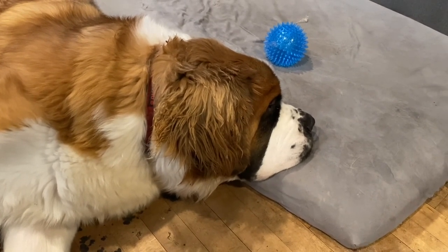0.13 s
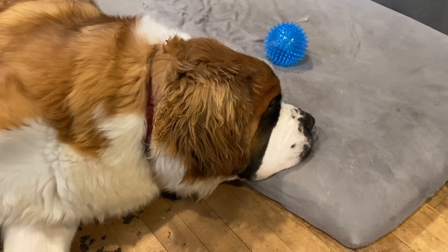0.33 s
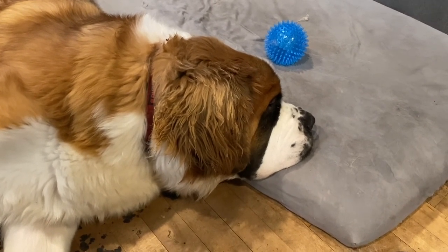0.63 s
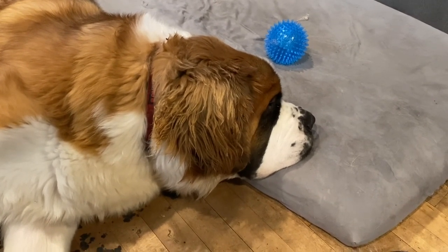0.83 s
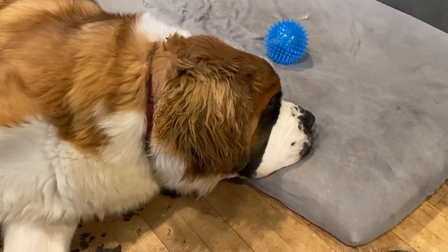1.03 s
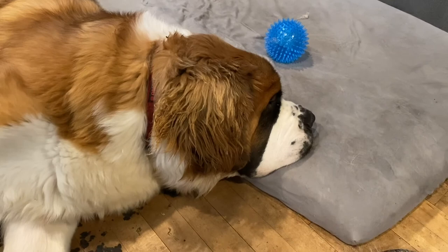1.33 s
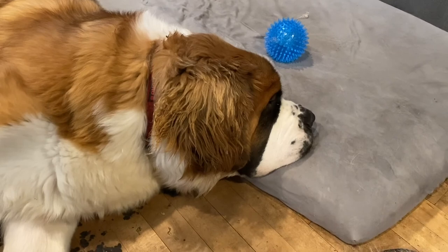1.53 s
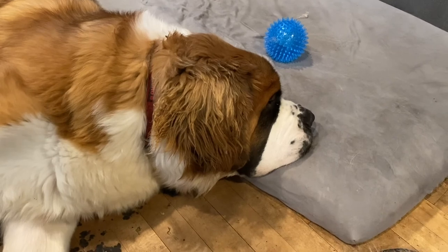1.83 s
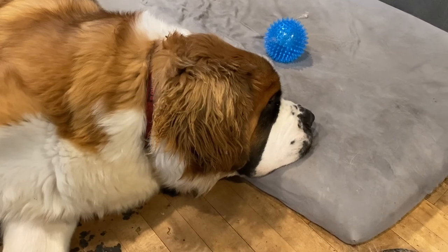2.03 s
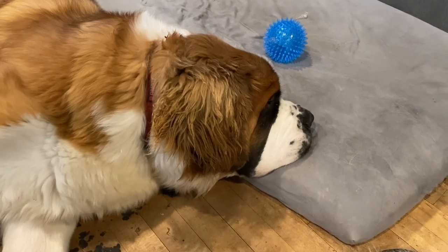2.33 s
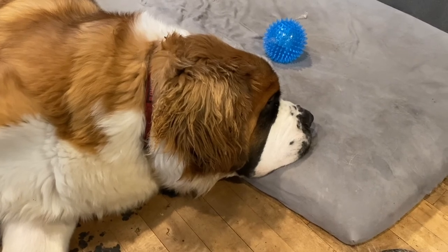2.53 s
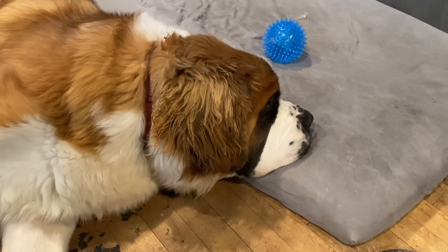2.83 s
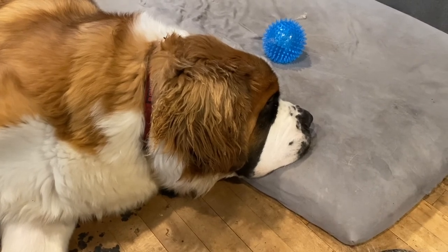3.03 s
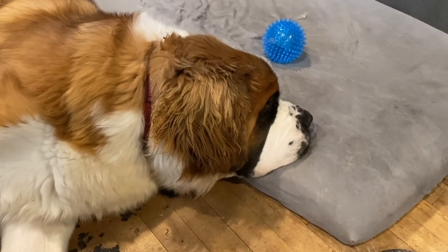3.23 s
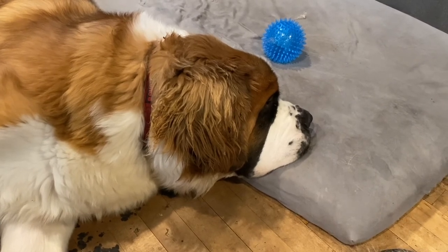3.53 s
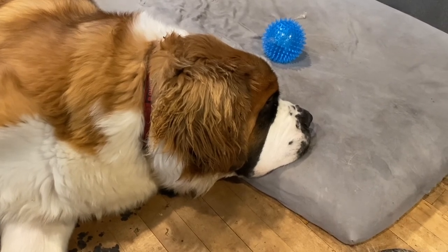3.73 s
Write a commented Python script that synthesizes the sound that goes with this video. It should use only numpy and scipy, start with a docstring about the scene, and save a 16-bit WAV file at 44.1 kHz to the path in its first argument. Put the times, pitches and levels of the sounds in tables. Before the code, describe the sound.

Single quiet dog snore, hissy and fluttering, swelling and ending in a soft click, followed by a brief airy tail and tiny breaths, over steady low indoor rumble, faint machine hum and thin hiss, in stereo.

```python
"""A quiet room, where a large dog sleeps on a cushion and gives one faint snore. Turbulent air hisses through the
resonances of its nose while the soft palate flaps some 20 times a second, each flap a decaying puff of noise;
once the palate pops and rings the mouth cavity. Soft broad puffs of breath, shaped noise, come before and after.
The room rumbles in its low modes, as noise and one wavering sine, with faint machine tones under a thin hiss."""
import sys
import numpy as np
from scipy import signal
from scipy.fft import rfft, irfft, next_fast_len
from scipy.io import wavfile
from scipy.ndimage import uniform_filter1d, map_coordinates

SR = 44100
rng = np.random.default_rng(int(sys.argv[2]) if len(sys.argv) > 2 else 0)


def int16_out(signal):
    """Quantize to a 16-bit WAV file."""
    q = np.round(np.clip(np.atleast_2d(signal).T, -1, 1) * 32767)
    wavfile.write(sys.argv[1], SR, q.astype(np.int16))


def magnitude_from_level(level_db):
    """Linear magnitude for a level in decibels (20 dB per decade)."""
    exponent = np.asarray(level_db, float) / 20
    return 10 ** exponent


N = 171990  # length in samples

# Stereo likeness of the dog's noises. Each row: frequency in Hz, left-right correlation.
DOG_CORRELATION = [(400, 0.58), (1000, 0.12), (2000, 0.75), (3000, .5), (5000, 0.21), (10000, 0.25)]


def unit(x):
    """Normalisation: scale to rms 1."""
    return x / np.sqrt(np.mean(x ** 2) + 1e-20)


def along(points, hz):
    """Interpolation of (Hz, value) points on a logarithmic frequency axis."""
    f, v = np.transpose(points)
    return np.interp(np.log(hz + 1), np.log(f + 1), v)


def level(rows):
    """Envelope: gain per sample, linear in dB between (s, dB) rows."""
    s, db = np.transpose(rows)
    return magnitude_from_level(np.interp(np.arange(N) / SR, s, db))


def wobble(rate):
    """Slow random fluctuation: a smooth curve through normal draws, rate knots a second."""
    knots = rng.standard_normal(int(N * rate / SR) + 4)
    return map_coordinates(knots, [np.arange(N) * rate / SR])


def wavering_tone(hz):
    """Frequency modulation: phase is the running sum of a frequency that drifts by about 1.2 Hz."""
    return np.sin(2 * np.pi * np.cumsum(hz + 1.2 * wobble(8)) / SR)


def filtered(x, response):
    """Linear filtering: multiply the spectrum by a complex response of frequency."""
    m = next_fast_len(N + SR // 2)
    return irfft(rfft(x, m) * response(np.fft.rfftfreq(m, 1 / SR)), m)[..., :N]


def resonances(rows):
    """Superposed damped resonators of alternating sign, from (Hz, width in Hz, dB) rows."""
    def response(f):
        total = 0
        for k, (centre, width, db) in enumerate(rows):
            damping = 1j * f * width
            total = total + (-1) ** k * magnitude_from_level(db) * damping / (centre * centre - f * f + damping + 1e-9)
        return total
    return response


def colour(points):
    """Spectral envelope: zero-phase response through (Hz, dB) points."""
    return lambda hz: magnitude_from_level(along(points, hz))


def rush(response, correlation, patchy_db):
    """Turbulence noise in stereo: mid at rms 1, side set by the correlation, streaks of random gain."""
    z = signal.stft(rng.standard_normal((2, N)), nperseg=1024)[2]
    field = uniform_filter1d(rng.standard_normal(z.shape[1:]), size=2, axis=0)
    field = uniform_filter1d(field, size=6, axis=1)  # longer in time than in frequency
    pair = signal.istft(z * magnitude_from_level(patchy_db * unit(field)), nperseg=1024)[1][:, :N]

    def mid_side(hz):
        angle = np.arccos(np.clip(along(correlation, hz), -1, 1)) / 2
        return response(hz) * [np.cos(angle), np.sin(angle)]

    mid, side = filtered(pair, mid_side)
    return np.array([mid + side, mid - side]) / np.sqrt(np.mean(mid ** 2))


def palate_flaps():
    """Pulsed airflow: each flap releases a quick-rising, exponentially dying puff; nose, throat, bright gains."""
    # Flaps of the soft palate. Each row: time in seconds (the puff starts one rise time before),
    # level in dB before a 6 dB lift, throat part and bright part in dB relative to the nose part.
    flaps = [(0.724, -70.5, 14, -4), (0.82, -69, 10, -3), (0.904, -69, 20, -1), (0.952, -65, 18.5, 0.5),
             (0.998, -55.5, 8, -5), (1.048, -54, 7.5, -9), (1.103, -58.5, 12.5, -21), (1.138, -63, -1, -19),
             (1.2, -61, -6, -18), (1.245, -56, 2, -18), (1.277, -53.5, 0.5, -18), (1.314, -53.5, 6.5, -16),
             (1.356, -48, -17, -12), (1.405, -60, -4, -28)]
    rise_s, t60_s = 0.0053, 0.087
    t = np.arange(N) / SR
    nose, throat, bright = np.zeros((3, N))
    for s, db, throat_db, bright_db in flaps:
        u = np.maximum(t - s + rise_s, 0)
        puff = magnitude_from_level(db + 6 - 60 * u / t60_s) * (1 - np.exp(-u / rise_s)) ** 2
        nose += puff
        throat += magnitude_from_level(throat_db) * puff
        bright += magnitude_from_level(bright_db) * puff
    return nose, throat, bright


def nose_hiss():
    """Resonance of the nasal passages: turbulence noise rings in upper and lower formants."""
    # Upper nose resonances. Each row: frequency in Hz, width in Hz, level in dB.
    upper = [(2680, 240, -2), (2970, 136, 1), (3164, 145, -2.5)]
    # Lower nose resonances. Each row: frequency in Hz, width in Hz, level in dB.
    lower = [(1975, 270, 1.5), (2415, 190, -1.5)]
    # Share of the lower resonances against the upper. Each row: time in seconds, level in dB.
    lower_share = [(0.65, 17), (0.75, 0), (0.9, -5.5), (1.1, -7.5), (1.2, -7.5), (1.33, -11.5), (1.4, -4.5),
                   (1.55, -4.5), (1.65, -3), (1.9, -0.5), (2.2, -4), (2.45, 8)]

    def steep(rows):
        """Band limits: resonances confined between 1700 and 3600 Hz."""
        peaks = resonances(rows)
        return lambda hz: peaks(hz) / (1 + (1700 / (hz + 1)) ** 8) / (1 + (hz / 3600) ** 12)

    upper_hiss = rush(steep(upper), DOG_CORRELATION, patchy_db=2)
    return upper_hiss + level(lower_share) * rush(steep(lower), DOG_CORRELATION, patchy_db=2)


def snore():
    """Modulated turbulence: steady flow and palate puffs drive noise in nose, throat and treble."""
    # Air drawn through the nose. Each row: time in seconds, level in dB.
    flow_rows = [(0.62, -104), (0.68, -89), (0.73, -73.5), (0.79, -79), (0.86, -71), (0.95, -66),
                 (1.15, -66.5), (1.33, -65.5), (1.43, -70), (1.495, -81), (1.53, -73), (1.62, -67),
                 (1.67, -73), (1.71, -86.5), (1.82, -96), (1.9, -73.5), (1.99, -86), (2.14, -82),
                 (2.25, -78.5), (2.32, -83.5), (2.42, -81), (2.57, -89), (2.7, -100)]
    # Throat colour of the flaps. Each row: frequency in Hz, level in dB.
    throat_colour = [(250, -120), (330, 4.5), (450, -4), (750, -5), (1100, -8.5), (1400, -16), (1700, -120)]
    # Throat colour of the flow. Each row: frequency in Hz, level in dB.
    chest_colour = [(280, -53), (340, -2), (420, -5.5), (600, -30.5), (1000, -10.5), (1300, -27.5),
                    (1600, -120)]
    # Colour of the treble. Each row: frequency in Hz, level in dB.
    bright_colour = [(3100, -57), (3450, 8.5), (3800, -1.5), (4400, -9), (5500, -14.5), (8000, -19.5),
                     (11000, -20.5), (13000, -120)]
    # Treble of the flow. Each row: time in seconds, level in dB relative to the flow.
    treble = [(0.65, -8), (0.85, -9), (1.0, -8), (1.1, -8), (1.18, -16), (1.45, -10), (1.65, -16),
              (2.0, -16)]
    nose, throat, bright = palate_flaps()
    flow = level(flow_rows)
    nose = np.hypot(nose, flow * magnitude_from_level(1.5 * wobble(60)))  # the flow flutters by about 1.5 dB
    bright = np.hypot(bright, flow * level(treble))
    flap_throat = throat * rush(colour(throat_colour), DOG_CORRELATION, patchy_db=0.7)
    flow_throat = magnitude_from_level(8.5) * flow * rush(colour(chest_colour), DOG_CORRELATION, patchy_db=0.7)
    treble_hiss = bright * rush(colour(bright_colour), DOG_CORRELATION, patchy_db=2)
    return nose * nose_hiss() + flap_throat + flow_throat + treble_hiss


def palate_pop():
    """Impulsive excitation: the palate comes unstuck and the mouth cavity rings in decaying modes."""
    # Modes of the mouth cavity. Each row: frequency in Hz, level in dB before the common gain, t60 in seconds.
    modes = [(890, 1, 0.06), (953, 5.5, .045), (1020, -14, 0.039)]
    start_s, rise_s, gain_db = 1.3542, 0.002, -29
    halves = np.array([[0.5], [-0.5]])  # left, right
    # the left channel hears it 0.2 ms earlier and 5.5 dB weaker
    u = np.maximum(np.arange(N) / SR - start_s + 0.0002 * halves, 0)
    ring = sum(magnitude_from_level(db - 60 * u / t60) * np.sin(2 * np.pi * hz * u) for hz, db, t60 in modes)
    attack = 1 - np.exp(-(u / rise_s) ** 2)
    return magnitude_from_level(gain_db) * ring * attack * magnitude_from_level(-5.5 * halves)


def breaths():
    """Turbulent exhalation: the end of one breath out and a few puffs, noise under smooth envelopes."""
    # Fading end of a breath out. Each row: time in seconds, level in dB.
    sigh = [(0, -59.5), (0.06, -72), (0.12, -72.5), (0.2, -77.5), (0.26, -81), (0.4, -110)]
    # Its colour. Each row: frequency in Hz, level in dB.
    sigh_colour = [(1400, -54), (1700, -9), (2350, -3.5), (2900, -13), (3500, 0), (3800, -6), (4100, -0.5),
                   (4500, -11), (4900, -7), (5600, -16), (7000, -16), (8600, -22), (9700, -18),
                   (12000, -26), (14000, -84)]
    # Puffs of breath. Each row: peak time, rise and fall in seconds, broad part and dull part in dB.
    puffs = [(1.745, 0.027, 0.024, -91, -68), (1.91, 0.018, 0.06, -76, -74), (2.01, 0.011, 0.022, -81, -77),
             (2.36, 0.11, 0.13, -77, -75)]
    # Colour of the broad part. Each row: frequency in Hz, level in dB.
    broad_colour = [(2500, -60), (3500, -3.5), (6000, -5), (9000, -6.5), (12200, -11.5), (13000, -120)]
    # Colour of the dull part. Each row: frequency in Hz, level in dB.
    dull_colour = [(900, -60), (1200, 8), (1700, -2), (2200, -15), (3000, -44)]
    t = np.arange(N) / SR
    broad, dull = np.zeros((2, N))
    for s, rise, fall, broad_db, dull_db in puffs:
        shape = np.exp(-((t - s) / np.where(t < s, rise, fall)) ** 2)
        broad += magnitude_from_level(broad_db) * shape
        dull += magnitude_from_level(dull_db) * shape
    layers = [(level(sigh), sigh_colour), (broad, broad_colour), (dull, dull_colour)]
    return sum(gain * rush(colour(points), DOG_CORRELATION, patchy_db=1.5) for gain, points in layers)


def room(x):
    """Reverberation: convolution with noise in which each frequency decays at its own speed."""
    # Decay of the room. Each row: frequency in Hz, t60 in seconds.
    decay = [(500, 0.9), (1000, 0.09), (3000, 0.099), (10000, 0.21)]
    hz, t, z = signal.stft(rng.standard_normal((2, SR // 2)), SR, nperseg=256)
    tail = signal.istft(z * magnitude_from_level(-60 * t / along(decay, hz)[:, None]), SR, nperseg=256)[1]
    delayed = np.pad(x, ((0, 0), (260, 0)))  # about 6 ms before the echo sets in
    return signal.fftconvolve(delayed, tail / np.linalg.norm(tail[0]), axes=1)[:, :N]


def machine_tones():
    """Frequency and amplitude modulation: distant machinery hums in sines of wavering pitch and level."""
    # Machine tones. Each row: frequency in Hz, amplitude in dB.
    hum = [(201, -53), (274, -59.5), (575, -68.5)]
    return sum(magnitude_from_level(db + 1.8 * wobble(4.97)) * wavering_tone(hz) for hz, db in hum)


def low_mode_rumble():
    """Narrow-band noise: low room rumble near 68 Hz, drawn as a wavering sine; its rises and falls are chance."""
    # Chance rises and falls. Each row: time in seconds, rms level in dB.
    chance_rows = [(0.0, -37.5), (0.05, -48), (0.11, -54), (0.19, -47.5), (0.88, -43.5), (1.01, -33.5),
                   (1.28, -54.5), (1.38, -43.5), (1.67, -37.5), (1.86, -54.5), (2.6, -38), (2.94, -64),
                   (3.02, -44.5), (3.14, -58), (3.2, -43), (3.9, -47)]
    return np.sqrt(2) * level(chance_rows) * wavering_tone(67.9)


def background():
    """Modal resonance: rumble noise fills the low room modes, with machine tones and broad air noise."""
    # Low room modes. Each row: frequency in Hz, width in Hz, level in dB.
    room_modes = [(50, 16, -3), (73.6, 28, -5), (101.5, 15.5, -1), (125.3, 12, -6.5), (163.3, 11.9, -6),
                  (205, 16.2, -13.5), (274.9, 15, -13)]
    # Rumble. Each row: time in seconds, level in dB.
    rumble_rows = [(0, -40), (0.3, -41), (0.7, -41.5), (1.2, -40), (1.8, -40), (2.3, -41.5), (2.7, -40.5),
                   (3.2, -38), (3.45, -43), (3.9, -41.5)]
    # Colour of the broad noise. Each row: frequency in Hz, level in dB before the common gain.
    air_colour = [(20, -58), (32, -29.5), (60, -22), (130, -13.5), (220, -16.5), (350, -23), (490, -22.5),
                  (530, -25.5), (575, -24), (640, -28), (760, -27), (930, -28.5), (1100, -38),
                  (1280, -41.5), (1600, -46.5), (2500, -55), (4500, -57.5), (7300, -62), (8600, -67.5),
                  (10500, -63.5), (12200, -67.5), (15000, -90)]
    # Stereo likeness of the noises. Each row: frequency in Hz, left-right correlation.
    correlation = [(60, 1), (130, 0.85), (270, 0.72), (570, -0.22), (1220, -0.34), (2590, 0.077),
                   (5490, 0.11), (11700, 0.22)]
    # Stereo balance. Each row: frequency in Hz, left minus right in dB.
    balance = [(60, -0.5), (110, -0.5), (190, -2), (350, 1.0), (620, -1), (1120, 0), (2010, -1.5),
               (3620, 4.5), (6490, 2.5), (11700, -1.5)]
    modes = resonances(room_modes)
    low = lambda hz: modes(hz) / (1 + (35 / (hz + 1)) ** 4) / (1 + (hz / 330) ** 6)
    rumble = level(rumble_rows) * rush(low, correlation, patchy_db=0.47) + low_mode_rumble()
    air = magnitude_from_level(-47.5) * rush(colour(air_colour), correlation, patchy_db=2.1)
    return filtered(rumble + air + machine_tones(), lambda hz: magnitude_from_level(along(balance, hz) * [[0.5], [-0.5]]))


def scene():
    """Superposition: dog, its echo and the background."""
    dog = (snore() + breaths()) * magnitude_from_level([[-0.1], [0.1]])  # left, right in dB
    click = palate_pop()
    echo = room(magnitude_from_level(-6.5) * dog + magnitude_from_level(-10) * click)
    return dog + click + echo + background()


def low_pass(x):
    """Removes everything above the highest recorded frequency."""
    return signal.sosfilt(signal.butter(12, 12260, fs=SR, output="sos"), x)


def record(dry):
    """Signal chain: the finished mix goes through one last stage."""
    return low_pass(dry)


dry = scene()
out = record(dry)
int16_out(out)
```